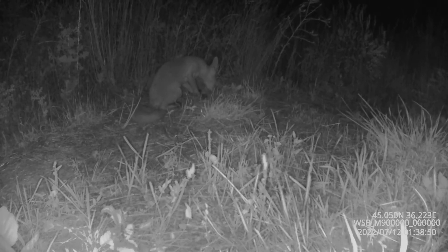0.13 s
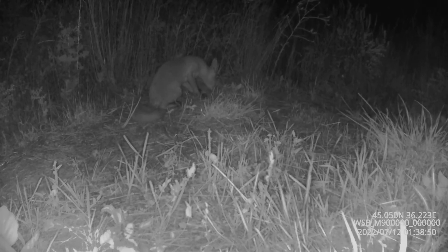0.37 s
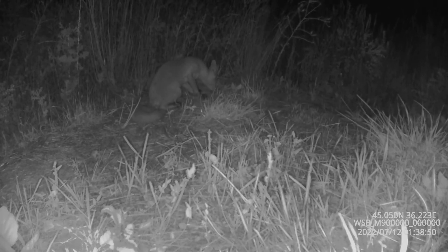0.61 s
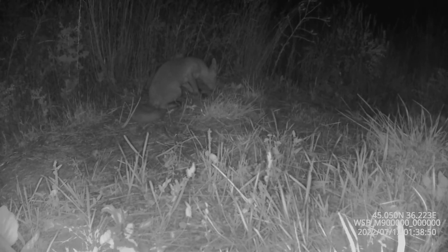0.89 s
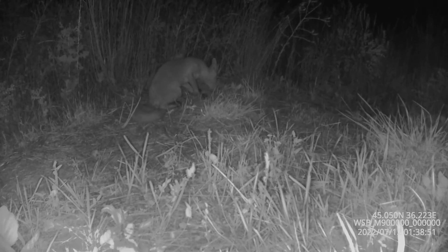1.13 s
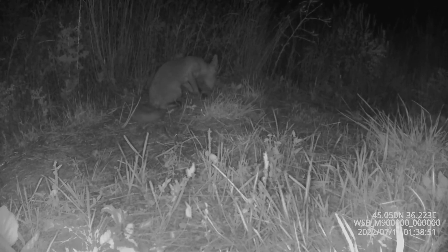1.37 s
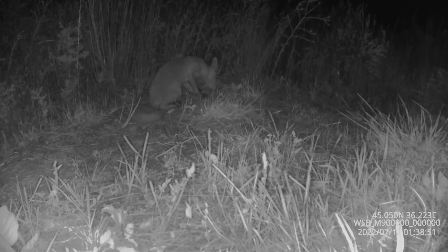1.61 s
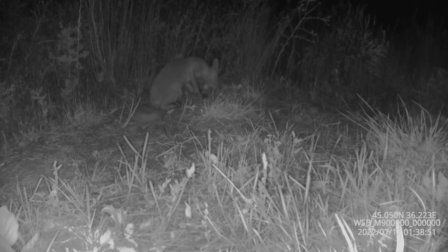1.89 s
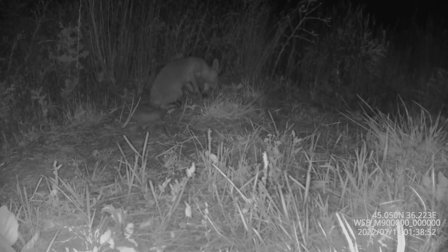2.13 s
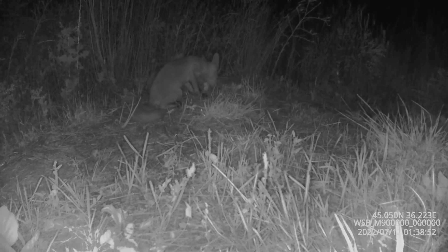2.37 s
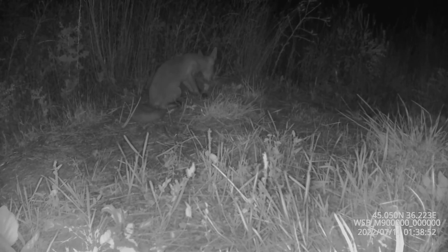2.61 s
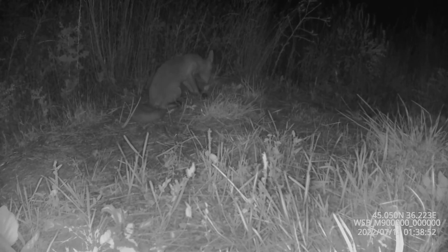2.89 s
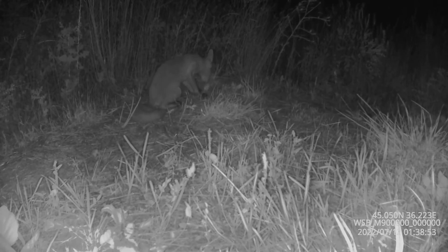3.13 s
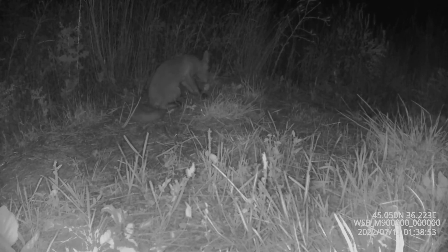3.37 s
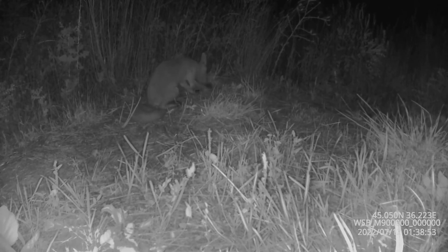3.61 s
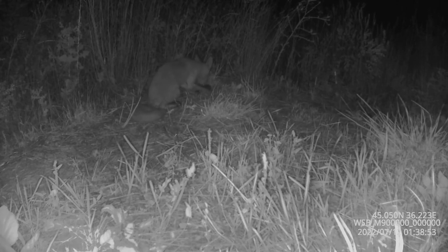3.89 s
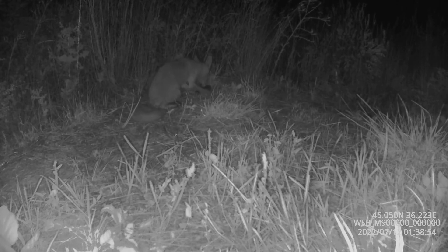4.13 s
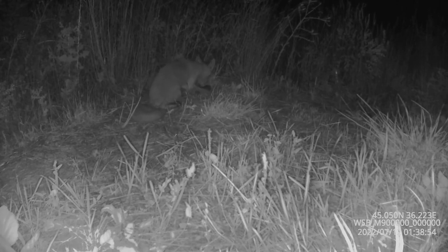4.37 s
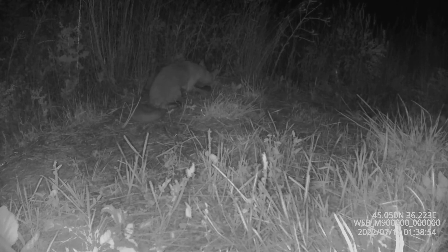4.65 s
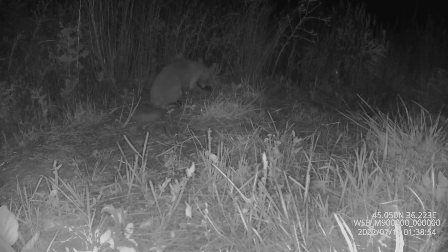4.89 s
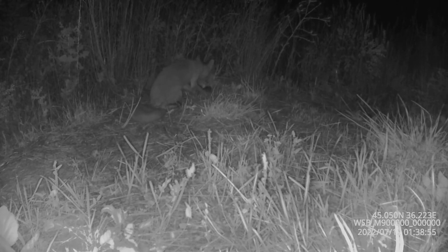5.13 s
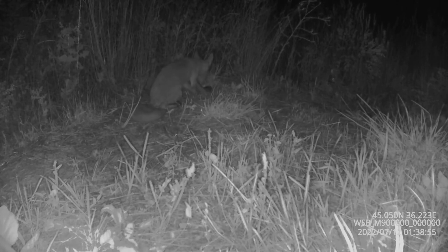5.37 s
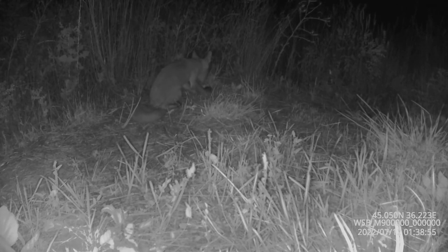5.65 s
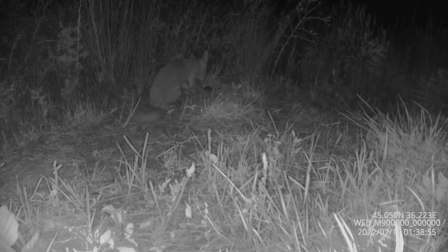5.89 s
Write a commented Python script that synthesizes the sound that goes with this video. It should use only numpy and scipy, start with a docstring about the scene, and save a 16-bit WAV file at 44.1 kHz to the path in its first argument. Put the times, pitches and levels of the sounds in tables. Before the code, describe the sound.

Outdoors at night in long grass, wind thuds and flutters low against the microphone, hardest in the first second, then looser and softer. Faint distant crickets trill almost continuously. A nearby cricket gives three sweet, fast-pulsed single-pitch trills, early, midway and near the end. A small animal snaps dry stalks now and then over thin rustle and soft hiss.

```python
"""Night in long grass. Throughout: far crickets (sine strokes over a noise band), a thin rasp (throbbing
noise), dry rustle (random grains), wind (filtered lumps and pushes, hardest in the first second), hiss.
From 0.76, 2.7 and 5.2 s a near tree cricket trills: sinking sine strokes with close echoes.
From 1.0 s a small animal snaps stalks now and then: cracks through three resonances.
From 2.9 to 4.1 s a faint katydid buzzes: a click train rings the wing resonances."""
import sys
import numpy as np
from scipy import signal
from scipy.fft import rfft, irfft
from scipy.io import wavfile
from scipy.ndimage import uniform_filter1d

SR = 44100
rng = np.random.default_rng(int(sys.argv[2]) if len(sys.argv) > 2 else 0)


def file_out(sig):
    """Save sig as 16-bit WAV at sys.argv[1]."""
    # one column per channel
    cols = np.atleast_2d(sig).T
    # limit, then scale
    lim = np.clip(cols, -1, 1)
    pcm = np.round(lim * 32767).astype(np.int16)
    wavfile.write(sys.argv[1], SR, pcm)


def natural_amplitude(level_db):
    """Convert a level in decibels to a linear amplitude factor, elementwise."""
    exponent = np.asarray(level_db, float) / 20
    return 10 ** exponent


N = 264931

# wind pressure: (time [s], slow part [dB rms], fast part [dB re slow part])
WIND = [(0, -24.5, -5.5), (.22, -24.5, -21), (.42, -19, -17), (.56, -20, -3), (.63, -19, -7.5),
        (.72, -25.5, -7.5), (.9, -21, -10.5), (1, -27, -21), (1.1, -32, -30.5), (1.45, -36.5, -27),
        (1.9, -28, -28), (2.3, -29.5, -28.5), (2.46, -27.5, -19), (2.6, -40.5, -24.5), (3, -35.5, -23),
        (3.7, -31.5, -24.5), (3.86, -48.5, -14), (4.15, -35, -24.5), (4.6, -31.5, -25.5), (5.1, -28.5, -14),
        (5.42, -32.5, -23.5), (5.58, -26, -21), (5.82, -39, -28), (5.93, -23, -17), (6, -28.5, -8.5)]
# spectra of slow and fast wind pressure: (frequency [Hz], relative density [dB])
SLOW_SPECTRUM = [(2.4, -22), (4.0, 5.5), (23, 1), (34, -4.5), (60, -23), (78, -39.5), (130, -120)]
FAST_SPECTRUM = [(29, -33.5), (50, -5.5), (68, 0), (199, -21.5), (360, -54), (400, -92), (520, -57),
                 (880, -120)]
# hardest wind pushes: (time of peak [s], peak [dB], Gaussian width [s])
BUFFETS = [(0.052, -10.5, 0.004), (0.115, -16, 0.0044), (0.265, -20, 0.0032), (0.37, -17, 0.0064),
           (0.451, -13.5, 0.0041), (0.572, -13, 0.0039), (0.592, -19.5, 0.0024), (0.623, -11.5, 0.0047),
           (0.826, -12, 0.0047), (0.863, -17, 0.011), (0.926, -11, 0.0054), (1.3, -25.5, 0.0054),
           (1.681, -24, 0.0062), (1.83, -19, 0.0065), (1.923, -21.5, 0.0068), (1.981, -27, 0.006),
           (2.076, -20, 0.004), (2.15, -17.5, 0.0063), (2.247, -23, 0.006), (2.411, -24.5, 0.006),
           (2.9, -24.5, 0.0061), (2.996, -25.5, 0.0066), (3.343, -25, 0.0081), (3.718, -25.5, 0.0081),
           (4.329, -26, 0.0048), (4.602, -29.5, 0.0036), (4.738, -18.5, 0.0088), (4.826, -24, 0.0055),
           (5.027, -26, 0.0057), (5.059, -23, 0.0037), (5.119, -17.5, 0.0075), (5.165, -26, 0.0039),
           (5.239, -24.5, 0.0062), (5.338, -26.5, 0.007), (5.461, -19, 0.0087), (5.546, -27, 0.003),
           (5.573, -23.5, 0.004), (5.915, -21.5, 0.0058)]
# microphone hiss spectrum: (frequency [Hz], relative density [dB])
HISS_SPECTRUM = [(60, -9.5), (150, 21), (300, 9.5), (600, 2.5), (1500, -2), (4000, -4.5), (7000, -5.5),
                 (15500, -9.5), (22050, -41)]
# far cricket trills: (approximate start [s], end [s], stroke rate [1/s], mean mid-stroke pitch [Hz], level [dB rms])
FAR_TRILLS = [(0.03, .2, 48, 2617, -65), (0.239, .46, 40, 2810, -71), (0.479, 1.269, 42.8, 2680, -62),
              (0.761, 1.273, 36.3, 2708, -60), (1.313, 1.622, 32.7, 2655, -65.5),
              (1.58, 1.999, 34, 2814, -71), (1.722, 1.97, 41.3, 2664, -65.5), (2.022, 2.272, 41, 2693, -68),
              (2.24, 2.931, 46, 2600, -65), (2.278, 2.499, 36, 2723, -70), (2.953, 3.631, 42, 2698, -62),
              (3.36, 3.618, 41, 2698, -61), (3.381, 3.748, 50.3, 2819, -66),
              (3.646, 3.897, 44.6, 2672, -64.5), (3.902, 4.201, 44, 2586, -79),
              (4.216, 4.465, 43, 2826, -76), (4.233, 4.457, 42, 2662, -73),
              (4.491, 4.722, 42.4, 2700, -70.5), (4.668, 5.239, 37.5, 2590, -65),
              (4.821, 5.152, 36, 2716, -65.5), (5.115, 5.501, 41, 2720, -60.5),
              (5.506, 5.986, 45, 2690, -60.5)]
# insect rasp bursts: (start [s], length [s], level [dB rms before fades])
RASP_BURSTS = [(0, .7, -77), (1.21, 0.063, -75), (1.43, 0.061, -79), (1.827, 0.15, -80.5),
               (2.213, .05, -77), (2.42, 0.081, -76), (2.84, 0.066, -79), (3.998, 0.35, -78.5),
               (4.534, 0.1, -79), (5.303, 0.069, -75), (5.64, 0.077, -78), (5.93, 0.078, -77)]
# whistled ticks of the rasping insect: (start [s], peak [dB], mid pitch [Hz, approximate])
TICKS = [(.7, -61, 6200), (4.11, -64, 6100)]
# katydid pace, sagging, restarting faster, sagging again: (time [s], mean click rate [1/s])
BUZZ_RATE = [(2.9, 206.5), (3.17, 200.3), (3.24, 212.8), (3.48, 214.5), (3.62, 211.3), (4.1, 203.5)]
# katydid loudness: (time [s], level [dB rms])
BUZZ_LEVEL = [(2.88, -95), (2.91, -74.5), (3.2, -75.5), (3.8, -74.5), (4.03, -77), (4.1, -95)]
# katydid wing resonances: (frequency [Hz], one-pass width [Hz], gain [dB])
WING_MODES = [(5150, 450, -3), (5700, 450, 0), (6350, 320, 0)]
# dry rustle loudness: (time [s], level [dB rms])
RUSTLE_LEVEL = [(0, -79), (.9, -71.5), (2.68, -77), (3.11, -70.5), (4.5, -83.5), (5.95, -70.5)]
# stalk snaps: (time [s], middle ring peak [dB], hollow ring [dB re middle], bright ring [dB re middle],
# initial ragged tail [dB re crack, before filtering])
SNAPS = [(1.0353, -51, 0, -22, -22), (1.0669, -60, -5, -18, -26), (1.2508, -61, -5, -9, -24),
         (1.2863, -50.5, -9, -24, -23), (1.4669, -63, 4, -7, -28), (1.6535, -61, 2, -8, -26),
         (1.7031, -47, -10, -6, -22), (1.7463, -55, -10, -13, -18), (2.6691, -58, -5, -16, -24),
         (2.6904, -59, -3, -16, -26), (2.6964, -46, -12, -17, -26.5), (3.1111, -45, -17, -11, -37),
         (3.6161, -53.5, -10, -8, -17), (3.8365, -52, -12, -8, -16), (4.5926, -59, -7, -6, -26),
         (4.9296, -48, -15, -17, -28), (5.1533, -52, -3.5, -11, -24), (5.3448, -38, -17, -14, -23)]
# stalk resonances, hollow, middle, bright: (frequency [Hz], one-pass width [Hz])
STALK_MODES = [(2030, 650), (3300, 1800), (5200, 2000)]
# near cricket trills: (nominal first stroke [s], strokes [count], first gap [s],
# gap growth per stroke [s], mean direct stroke peak [dB])
NEAR_TRILLS = [(.7594, 32, .02417, .0000354, -45.4), (2.7061, 26, .02429, .0000322, -45.8),
               (5.2364, 32, .02443, .0000201, -45.7)]
# direct sound and close reflections off leaves and ground: (delay [s], signed gain [ratio])
CLOSE_ECHOES = [(0, 1), (.0053, -1.316), (.01095, .302)]


def evened(x):
    """Scales to rms 1."""
    return x / np.sqrt(np.mean(x ** 2) + 1e-20)


def curve(rows, column=1):
    """Interpolates one table column at every sample."""
    rows = np.array(rows)
    return np.interp(np.arange(N) / SR, rows[:, 0], rows[:, column])


def add(mix, start_s, sound):
    """Mixes a sound in at start_s, cut off at the end of the mix."""
    part = mix[round(start_s * SR):][:len(sound)]
    part += sound[:len(part)]


def coloured(x, spectrum):
    """Weights the spectrum of x, interpolating over log frequency; rms 1."""
    table_hz, table_db = np.transpose(spectrum)
    hz = np.fft.rfftfreq(len(x), 1 / SR)
    gain_db = np.interp(np.log(hz + 1), np.log(table_hz + 1), table_db)
    return evened(irfft(rfft(x) * natural_amplitude(gain_db), len(x)))


def resonate(x, hz, width_hz):
    """A resonance of peak gain 1, passed twice for steep skirts."""
    b, a = signal.iirpeak(hz, hz / width_hz, SR)
    return signal.lfilter(b, a, signal.lfilter(b, a, x))


def bushes(x, t60_s):
    """Scattered echoes off stems: sparse decaying random taps of total energy 1."""
    t = np.arange(SR // 4) / SR
    taps = rng.standard_normal(len(t)) * (rng.random(len(t)) < .05) * natural_amplitude(-60 * t / t60_s)
    return signal.oaconvolve(x, taps / np.linalg.norm(taps))[:len(x)]


def stroke(start_hz, fall_hz, length_s, lean=1.43):
    """One wing closure: a sine that swells, dies and sinks in pitch by fall_hz."""
    u = np.arange(round(length_s * SR)) / (length_s * SR)
    cycles = length_s * (start_hz * u - fall_hz * u ** 2 / 2) + rng.random()
    return np.sin(np.pi * u ** lean) ** 2 * np.sin(2 * np.pi * cycles)


def hiss():
    """Steady microphone noise: coloured Gaussian noise."""
    return natural_amplitude(-63) * coloured(rng.standard_normal(N), HISS_SPECTRUM)


def buffet(out, peak_s, peak_db, width_s):
    """A one-way push with a sharp tip and a wider, balancing pull, added in place."""
    pull_width = 2.91  # re push
    crest_share, crest_width = .15, .36  # share of peak, width re push
    near = slice(max(round((peak_s - .1) * SR), 0), round((peak_s + .1) * SR))
    u = (np.arange(N)[near] / SR - peak_s) / width_s
    push = pull_width * np.exp(-u ** 2 / 2)
    pull = np.exp(-(u / pull_width) ** 2 / 2)
    body = (push - pull) / (pull_width - 1)
    crest = np.exp(-(u / crest_width) ** 2 / 2)
    out[near] *= 1 - .8 * np.exp(-u ** 2 / 12)  # smaller eddies swept aside
    out[near] += natural_amplitude(peak_db) * (crest_share * crest + (1 - crest_share) * body)


def wind():
    """Eddies push the diaphragm one way; the same lumps drive slow and fast pressure."""
    lump_rate_hz = 60
    lumps = natural_amplitude(3.47 * np.minimum(rng.exponential(1, N), 3)) * (rng.random(N) < lump_rate_hz / SR)
    lumps -= lumps.mean()
    slow = coloured(lumps, SLOW_SPECTRUM) + .77 * coloured(rng.standard_normal(N), SLOW_SPECTRUM)
    fast = coloured(lumps, FAST_SPECTRUM) + .46 * coloured(rng.standard_normal(N), FAST_SPECTRUM)
    slow_db = curve(WIND)
    fast_db = slow_db + curve(WIND, column=2)
    out = natural_amplitude(slow_db) * evened(slow) + natural_amplitude(fast_db) * evened(fast)
    for peak_s, peak_db, width_s in BUFFETS:
        buffet(out, peak_s, peak_db, width_s)
    return out


def far_crickets():
    """Each trill has its own pace and echo blur; the farthest melt into a noise band."""
    fall_hz, stroke_s = 217, .01795
    out = np.zeros(N)
    for start_s, end_s, rate_hz, mid_hz, level_db in FAR_TRILLS:
        length_s = end_s - start_s
        trill = np.zeros(round((length_s + .2) * SR))
        for at_s in np.arange(0, length_s, 1 / rate_hz):
            jitter, loudness, pitch = rng.standard_normal(3)
            start_hz = mid_hz + fall_hz / 2 + 8 * pitch
            closure = stroke(start_hz, fall_hz, stroke_s, lean=1.4)
            add(trill, .0027 + at_s + .0005 * jitter, natural_amplitude(1.1 * loudness) * closure)
        trill += natural_amplitude(-4) * bushes(trill, t60_s=.09)
        rms = np.sqrt(np.sum(trill ** 2) / (length_s * SR))
        add(out, start_s - .011, natural_amplitude(level_db) * trill / rms)
    chorus = resonate(rng.standard_normal(N), hz=2670, width_hz=320)
    return out + natural_amplitude(-70) * evened(chorus)


def click_turns():
    """Running click count at the katydid's pace, slightly uneven."""
    waver = evened(uniform_filter1d(rng.standard_normal(N), size=900))
    return np.cumsum(curve(BUZZ_RATE) * (1 + .004 * waver)) / SR


def rasping_insect(turns):
    """Narrow-band noise throbs at the click rate in bursts; ticks are short sinking whistles."""
    out = np.zeros(N)
    noise = resonate(rng.standard_normal(N), hz=6180, width_hz=660)
    rasp = evened((1 + .5 * np.cos(2 * np.pi * turns)) * noise)
    for start_s, length_s, level_db in RASP_BURSTS:
        part = rasp[round(start_s * SR):][:round(length_s * SR)]
        fades = signal.windows.tukey(len(part), min(.023 / length_s, 1))
        add(out, start_s, natural_amplitude(level_db) * part * fades)
    for start_s, peak_db, hz in TICKS:
        add(out, start_s, natural_amplitude(peak_db) * stroke(hz + 100, fall_hz=130, length_s=.013))
    return out


def katydid(turns):
    """Tooth clicks, summed from harmonics 22 to 34, and scrape noise ring the wing."""
    clicks = sum(np.cos(2 * np.pi * k * turns) for k in range(22, 35))
    drive = evened(clicks) + .9 * rng.standard_normal(N)
    wing = sum(natural_amplitude(gain_db) * resonate(drive, hz, width_hz) for hz, width_hz, gain_db in WING_MODES)
    return natural_amplitude(curve(BUZZ_LEVEL)) * evened(wing)


def rustle():
    """Tiny random snaps, scattered by stems, through one broad resonance."""
    grain_rate_hz = 500
    grains = rng.standard_normal(N) * natural_amplitude(2.8 * np.minimum(rng.exponential(1, N), 3.6))
    grains *= rng.random(N) < grain_rate_hz / SR
    dry_grass = resonate(bushes(grains, t60_s=.066), hz=3060, width_hz=1600)
    return natural_amplitude(curve(RUSTLE_LEVEL)) * evened(dry_grass)


def stalk_snaps():
    """A sharp crack with a ragged noise tail rings three stalk resonances."""
    out, t = np.zeros(N), np.arange(2600) / SR
    grass_lowpass = signal.butter(4, 6500, fs=SR, output="sos")  # grass dulls the top
    for start_s, peak_db, hollow_db, bright_db, tail_db in SNAPS:
        crack = rng.standard_normal(len(t)) * natural_amplitude(tail_db - 60 * t / .09)
        crack[0] = 1
        crack = signal.sosfilt(grass_lowpass, crack)
        for (hz, width_hz), mode_db in zip(STALK_MODES, (hollow_db, 0, bright_db)):
            ring = resonate(crack, hz, width_hz)
            add(out, start_s, natural_amplitude(peak_db + mode_db) * ring / abs(ring).max())
    return out


def near_cricket():
    """Strokes slow a little through each trill; strong close echoes notch the tone."""
    stroke_s, start_hz, fall_hz = .0165, 2861, 117
    direct, out = np.zeros(N), np.zeros(N)
    for first_s, count, gap_s, growth_s, level_db in NEAR_TRILLS:
        k = np.arange(count)
        times_s = first_s + gap_s * k + growth_s * k * (k - 1) / 2
        for at_s in times_s:
            jitter, loudness, pitch = rng.standard_normal(3)
            closure = stroke(start_hz * (1 + .002 * pitch), fall_hz, stroke_s)
            add(direct, at_s + .0005 * jitter, natural_amplitude(level_db + .9 * loudness) * closure)
    for delay_s, gain in CLOSE_ECHOES:
        add(out, delay_s, gain * direct)
    return out + natural_amplitude(-13) * bushes(direct, t60_s=.09)


def scene():
    """Wind, insects and stalks at one microphone; rasp and katydid share a pace."""
    turns = click_turns()
    insects = far_crickets() + rasping_insect(turns) + katydid(turns)
    mix = wind() + insects + rustle() + stalk_snaps() + near_cricket()
    return mix[None]  # one channel


def roll_off(x):
    """The treble ends steeply here."""
    return signal.sosfilt(signal.butter(12, 15630, fs=SR, output="sos"), x)


def record(dry):
    """The microphone adds its steady hiss."""
    mix = dry + hiss()
    return roll_off(mix)


dry = scene()
out = record(dry)
file_out(out)
```